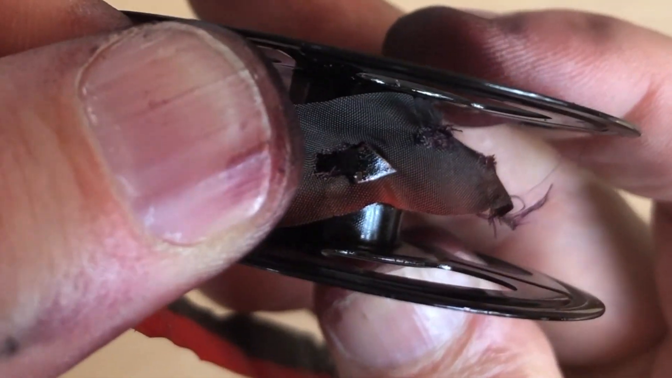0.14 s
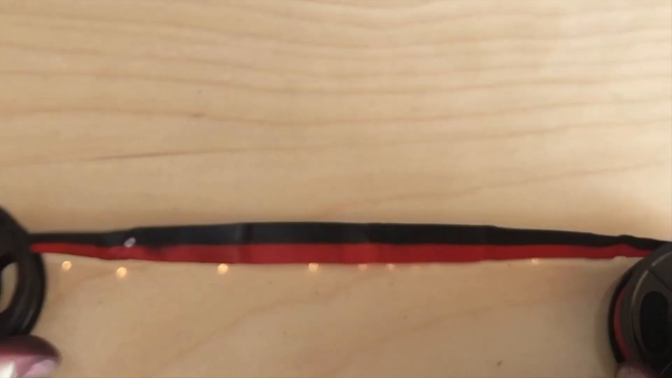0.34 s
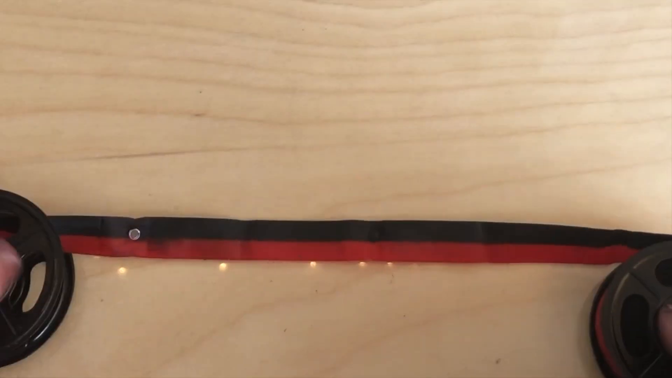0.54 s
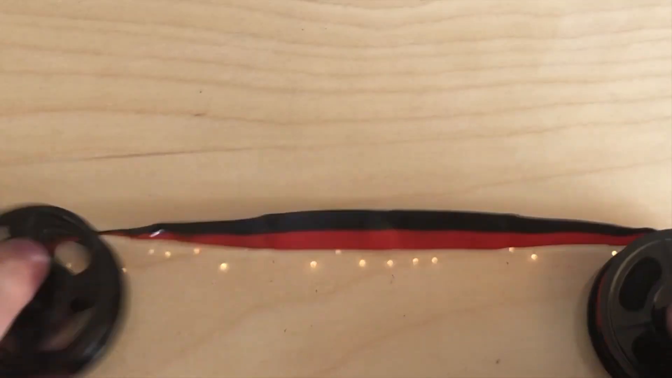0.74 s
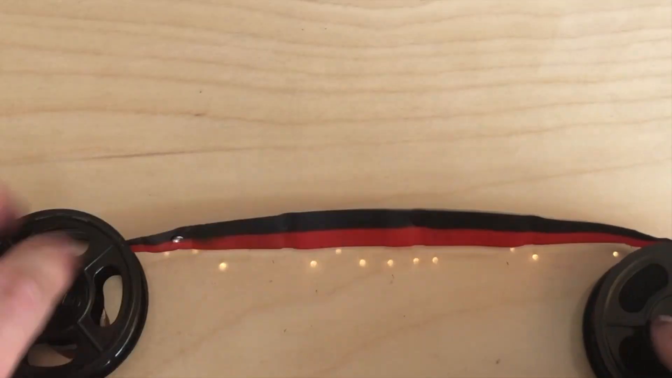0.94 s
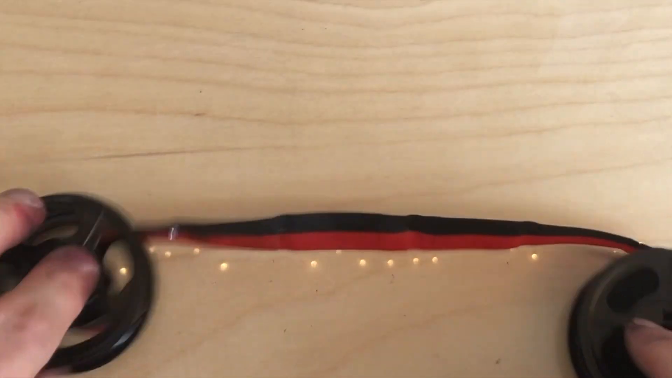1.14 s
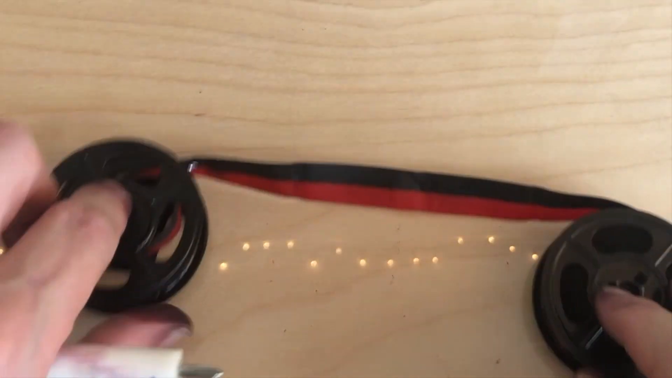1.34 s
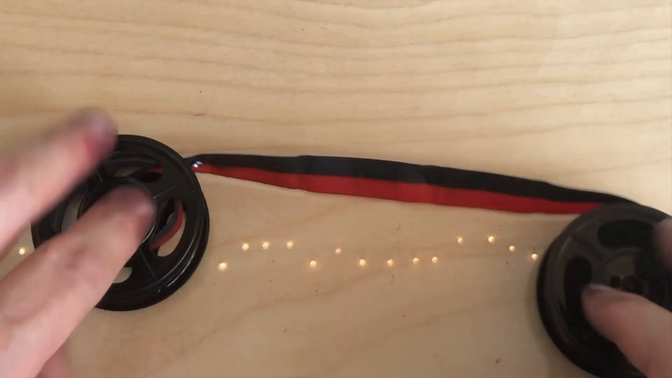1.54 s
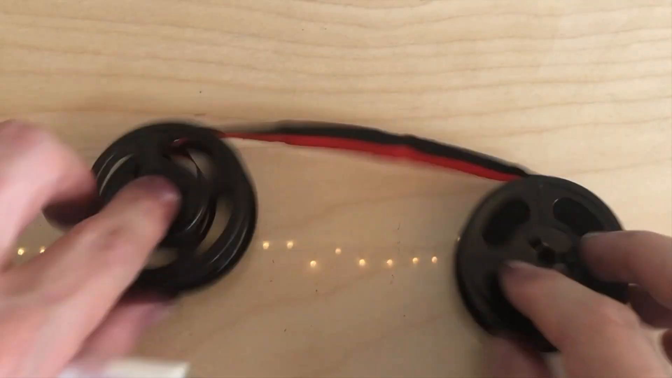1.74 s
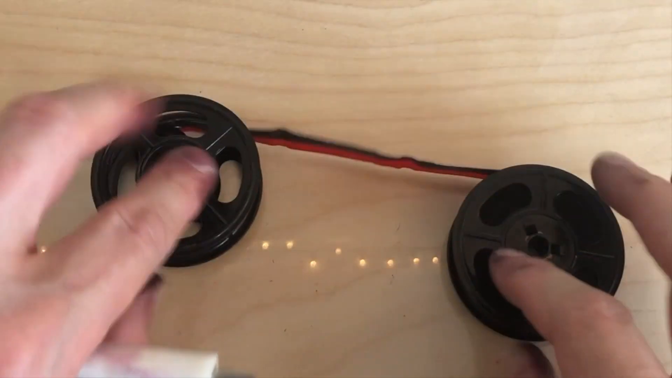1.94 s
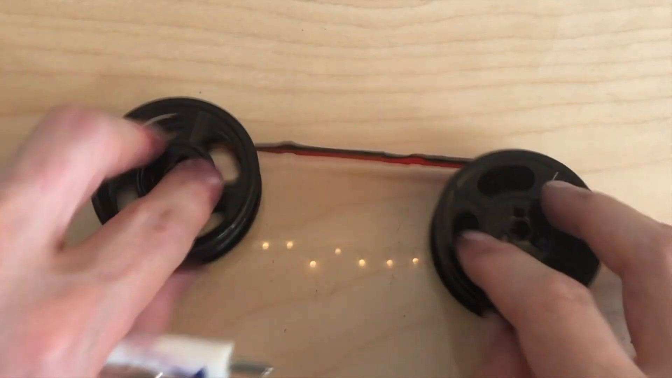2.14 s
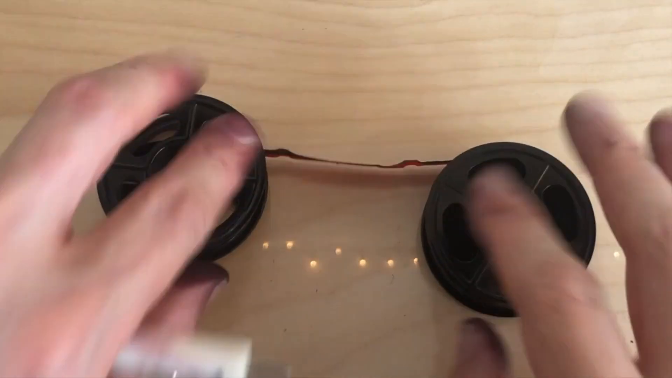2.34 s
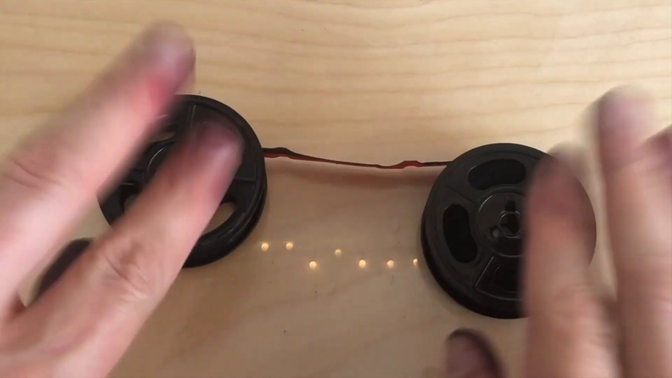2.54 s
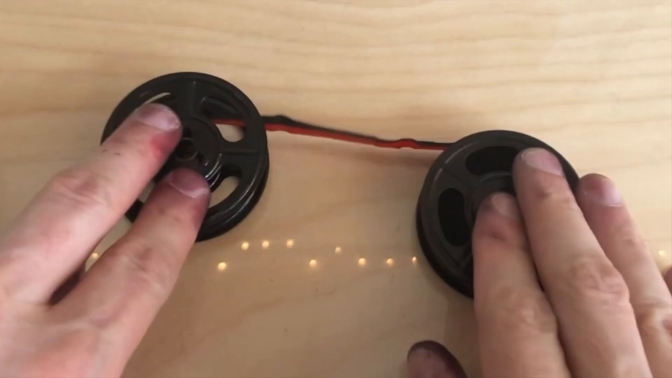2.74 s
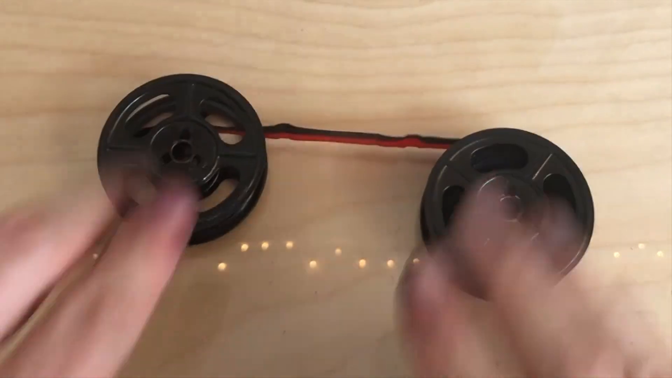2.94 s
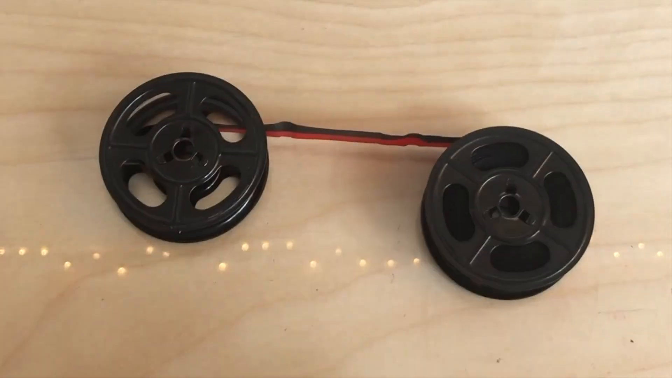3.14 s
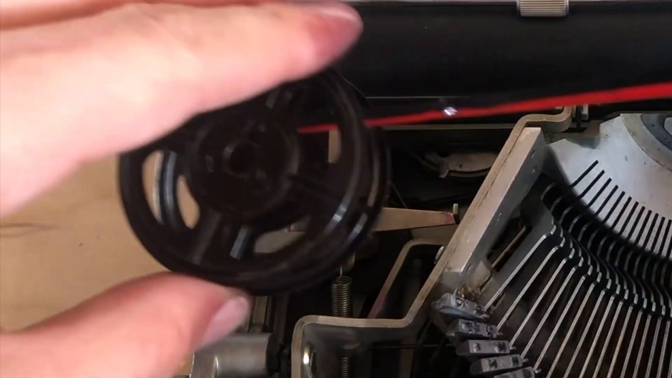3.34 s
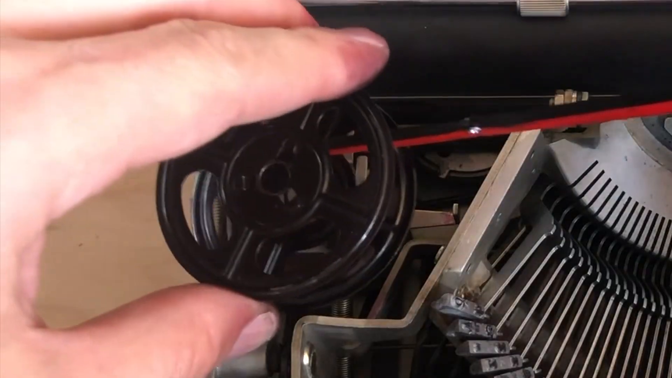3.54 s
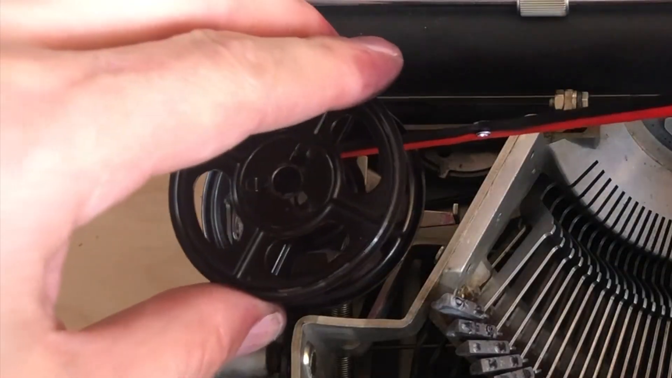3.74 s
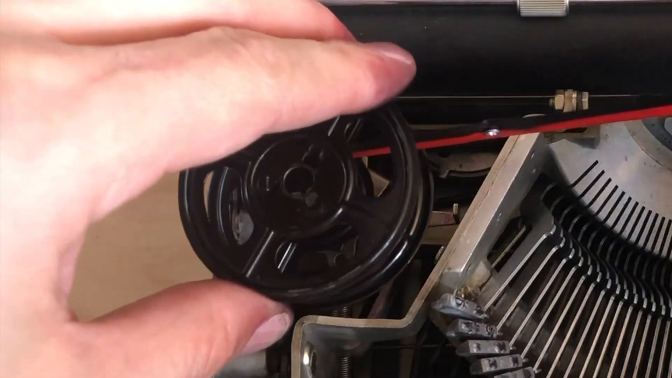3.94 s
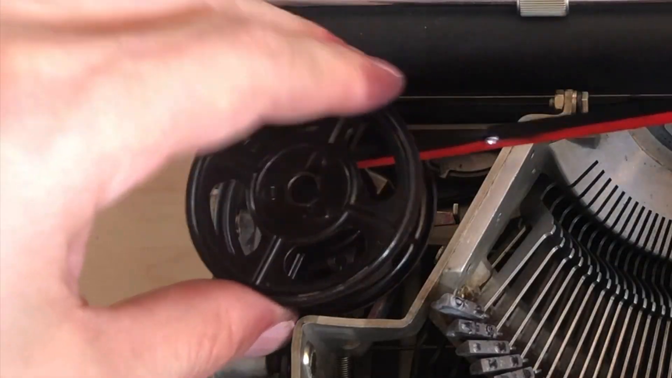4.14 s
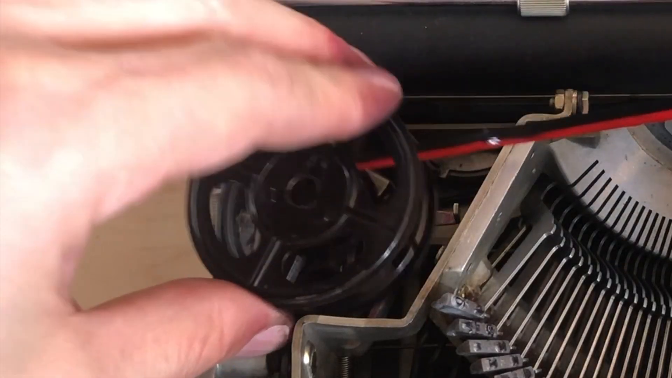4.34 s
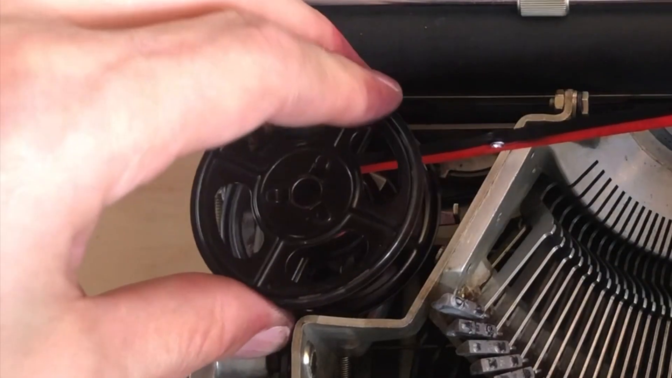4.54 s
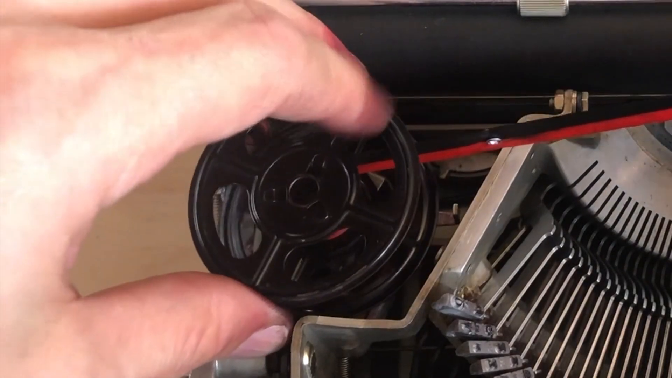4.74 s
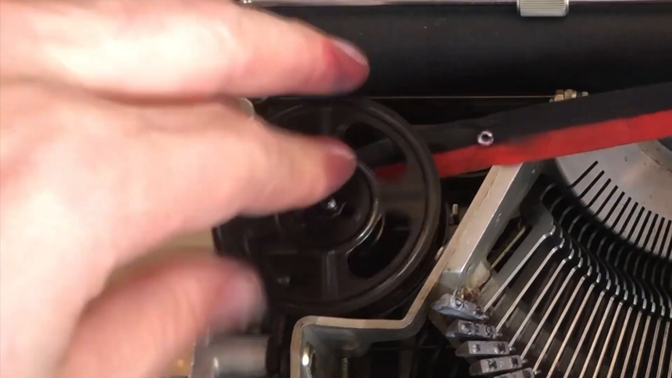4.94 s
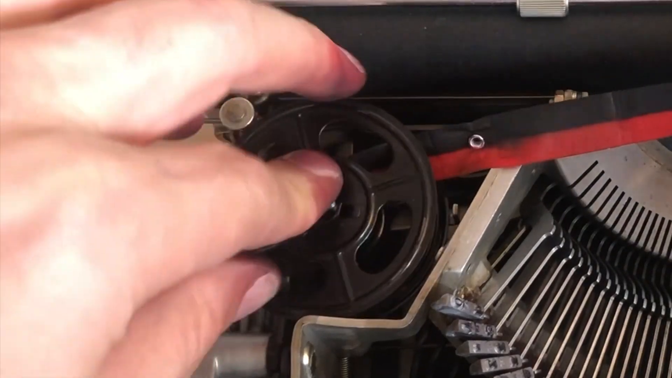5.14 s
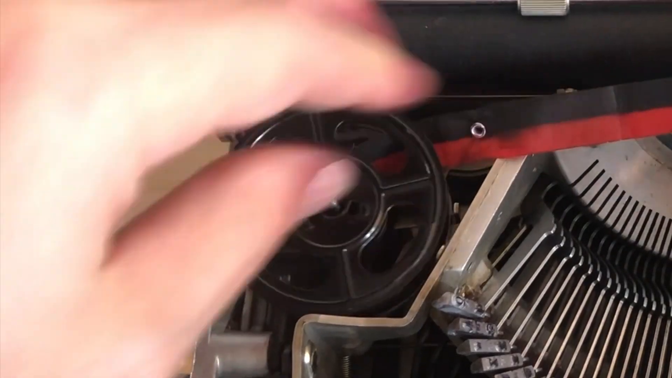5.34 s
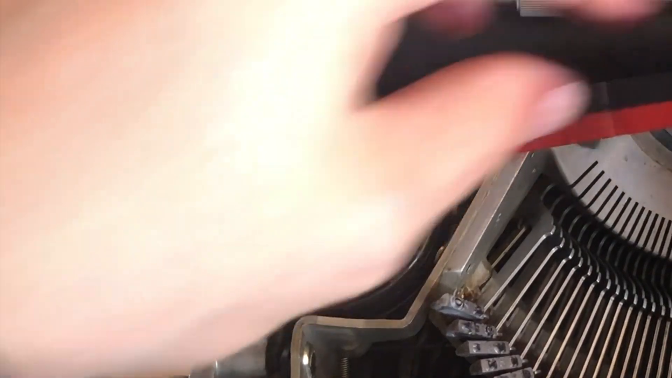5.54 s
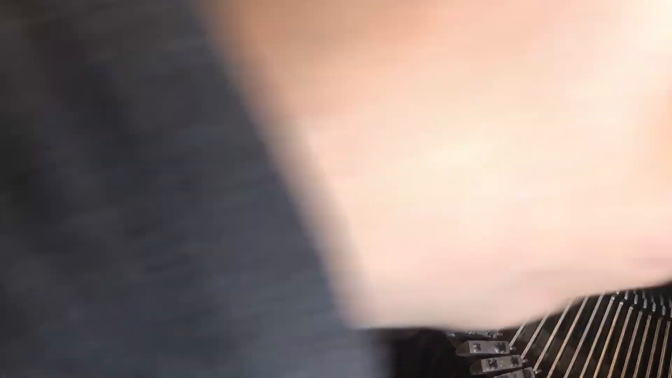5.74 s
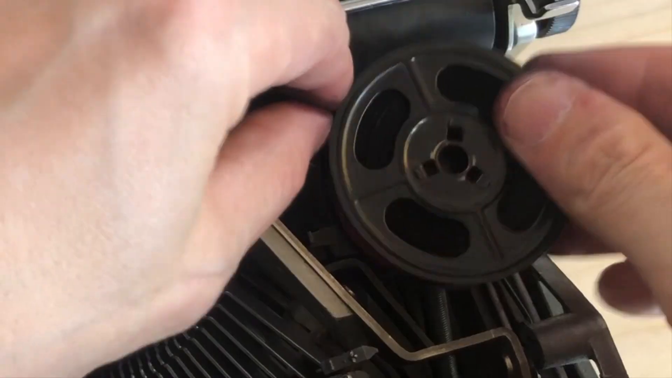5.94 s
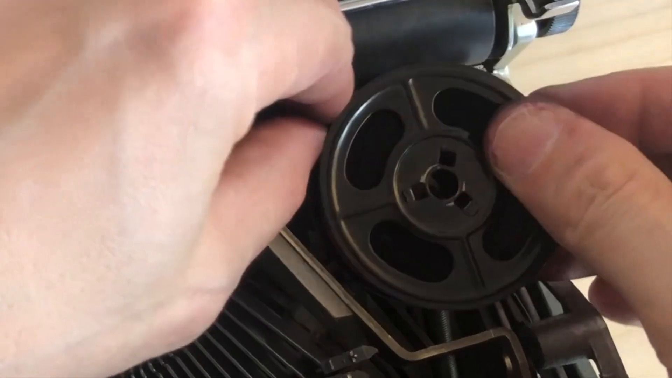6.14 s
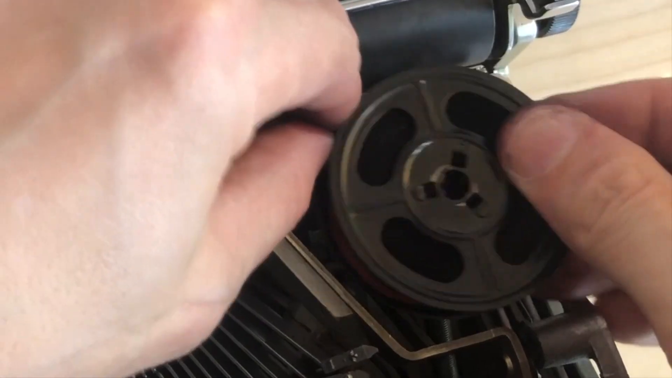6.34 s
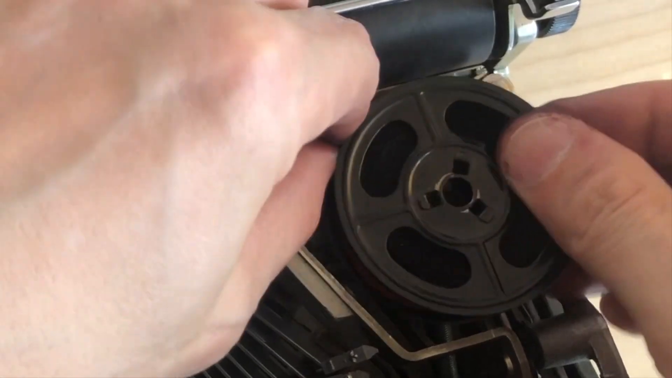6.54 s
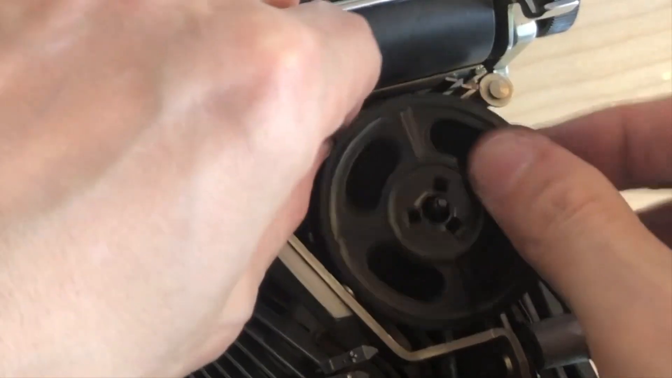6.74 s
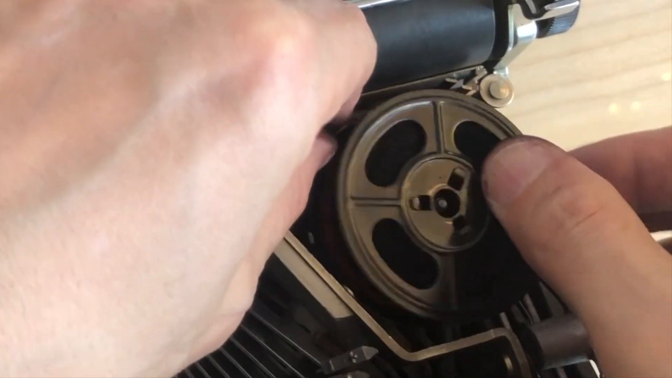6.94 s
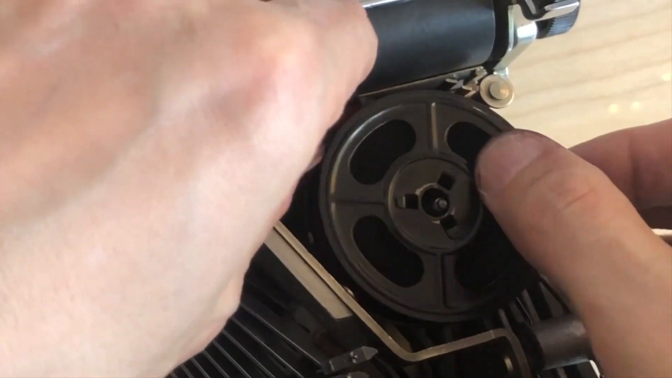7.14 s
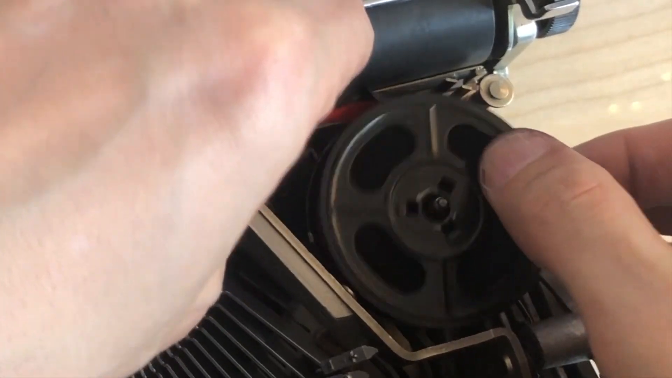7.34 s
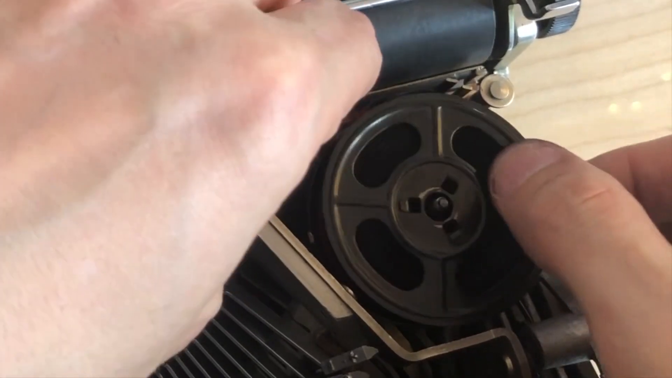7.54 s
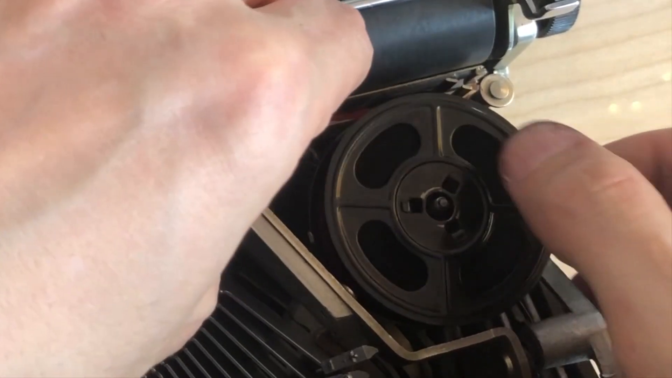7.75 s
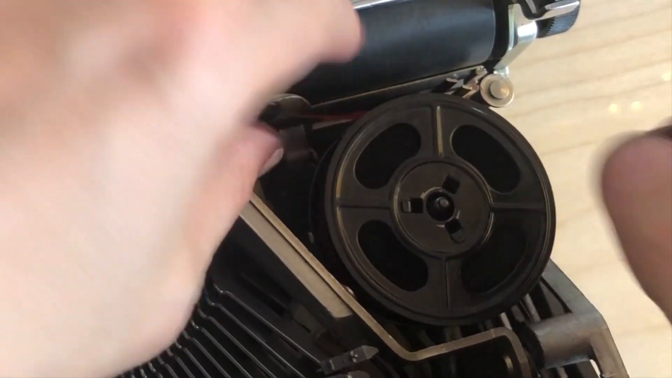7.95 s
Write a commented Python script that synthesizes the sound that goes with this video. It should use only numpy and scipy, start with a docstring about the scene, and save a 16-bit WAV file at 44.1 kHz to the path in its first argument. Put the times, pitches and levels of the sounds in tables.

```python
"""A wooden table in a small room, one microphone close by: two plastic ribbon spools are turned and tapped,
then from about 4 s set on the posts of a typewriter. Each contact is a knock plus a short chatter of noise,
made of decaying sines for the spool and what it rests on; knocks also push the board's low modes.
Pings, rubbing fingers and runs of sliding contacts join in, and a decaying noise tail answers as the room.
Shaped noise makes the room hiss and a slow rumble, both quieter once the scene moves to the typewriter."""
import sys
import numpy as np
from scipy import signal
from scipy.fft import rfft, irfft
from scipy.io import wavfile
from scipy.ndimage import uniform_filter1d

SR = 44100
rng = np.random.default_rng(int(sys.argv[2]) if len(sys.argv) > 2 else 0)


def amplitude_ratio(level_db):
    """Convert a level in decibels to the matching linear amplitude (field) ratio."""
    exponent = np.asarray(level_db, float) / 20
    return 10 ** exponent


def log_audio(samples):
    """Write samples as a 16-bit WAV file to the path given in sys.argv[1]."""
    # one column per channel
    frames = np.atleast_2d(samples).T
    # limit to full scale, then quantise
    limited = np.clip(frames, -1, 1)
    pcm = np.round(limited * 32767).astype(np.int16)
    wavfile.write(sys.argv[1], SR, pcm)


N = 356592  # samples


def rms_one(x):
    """Scale to unit rms."""
    return x / np.sqrt(np.mean(x ** 2) + 1e-20)


def in_time(rows):
    """A (time_s, level_db) curve as a gain for every sample."""
    time_s, level_db = np.transpose(rows)
    return amplitude_ratio(np.interp(np.arange(N) / SR, time_s, level_db))


def ring(force, hz, t60_s):
    """A two-pole resonator: a unit click sets a sine of height 1 ringing."""
    radius = amplitude_ratio(-60 / (t60_s * SR))
    turn = 2 * np.pi * hz / SR
    return signal.lfilter([0, np.sin(turn)], [1, -2 * radius * np.cos(turn), radius ** 2], force + 1e-18)


def coloured(spectrum):
    """White noise shaped to a (pitch_hz, level_db) spectrum; rms 1."""
    hz, level_db = np.transpose(spectrum)
    grid_hz = np.maximum(np.fft.rfftfreq(N, 1 / SR), 1)
    gain = amplitude_ratio(np.interp(np.log(grid_hz), np.log(hz), level_db))
    return rms_one(irfft(rfft(rng.standard_normal(N)) * gain, N))


# room hiss at the table: pitch_hz [Hz], level_db [relative dB per Hz]
TABLE_HISS = [(24, -63), (40, -0.5), (92, -10), (341, -11), (377, -13), (427, -9.5), (550, -12),
              (933, -13.5), (5870, -30), (14500, -35.5), (16500, -36)]
# room hiss at the typewriter: pitch_hz [Hz], level_db [relative dB per Hz]
POST_HISS = [(24, -38), (40, 7), (168, -7), (293, -4.5), (438, -5), (656, -6), (707, -8.5), (1230, -10.5),
             (3290, -20), (14200, -30.5), (16500, -31)]
# level of the rumble, mostly under 20 Hz: time_s [s], level_db [dB rms]
RUMBLE_LEVEL = [(0, -51), (.6, -42.5), (3.33, -43), (3.4, -53), (8.09, -54.5)]


def air():
    """Steady hiss that steps down at the move, over a wandering rumble: both are shaped noise."""
    move_s, table_hiss_db, post_hiss_db = 3.357, -52, -58.5
    at_table = np.arange(N) < move_s * SR
    table_hiss = amplitude_ratio(table_hiss_db) * coloured(TABLE_HISS)
    post_hiss = amplitude_ratio(post_hiss_db) * coloured(POST_HISS)
    hiss = np.where(at_table, table_hiss, post_hiss)
    rumble = coloured([(1, -8), (3.0, 6), (17, 7.5), (34, -15.5), (44, -46), (90, -58), (200, -120)])
    return hiss + in_time(RUMBLE_LEVEL) * rumble


# thin flanges of the spool, rung by every contact: pitch_hz [Hz], level_db [relative dB], t60_s [s, before grip]
FLANGE_MODES = [(3490, -4, 0.019), (4780, -8, 0.05), (6450, -5, .04), (8850, -23, 0.013),
                (12200, -7, 0.029), (13600, -16, 0.022)]
# moments when the fingers let the spool ring freely: start_s [s], end_s [s]
FREE_MOMENTS = [(.8, .9), (1.8, 1.9), (4.0, 4.7), (4.97, 5.5), (6.53, 6.6)]


def struck(events, modes, splits_hz, main, level_db, chatter_ms, swell, body_db, grit_db, crack_db,
           crack_hz, scatter_db):
    """Modes swell while tiny contacts chatter, then ring out; the chatter is noise; rows: rings, noise."""
    firm_db, soft_chatter_db_per_db = -21.5, 0.25   # contacts softer than a firm one chatter longer
    free_share, held_share = 0.76, 0.49             # share of the modes' t60, let go and gripped
    flutter = 3.7                                   # loose contacts roughen each ring
    size = 8192                                     # samples per contact
    t = np.arange(size) / SR
    modes = modes + FLANGE_MODES
    hz, mode_db, t60_s = np.transpose(modes)[:, :, None]
    group = np.searchsorted(splits_hz, hz)
    luck = rng.standard_normal((len(events), 4, len(modes), 1))
    grit = rng.standard_normal((len(events), 3, size))
    clumps = np.minimum(rng.exponential(1, (len(events), 1, size // 32)), 2.5)   # each under 1 ms
    grit = grit * (0.8 + np.repeat(clumps, repeats=32, axis=2))
    body = signal.butter(2, [350, splits_hz[1]], "band", fs=SR, output="sos")
    middle = signal.butter(2, splits_hz[1:], "band", fs=SR, output="sos")
    treble = signal.butter(1, crack_hz, "band", fs=SR, output="sos")
    wobble = uniform_filter1d(rng.standard_normal((len(modes), 4 * size)), size=150, axis=1)
    rough = 1 + flutter * wobble
    out = np.zeros((2, N + size))
    for (start_s, db, second_db, middle_db, treble_db), grains, chance in zip(events, grit, luck):
        at = round(start_s * SR)
        chatter_s = chatter_ms / 1000 * amplitude_ratio(soft_chatter_db_per_db * (firm_db - db))
        group_db = np.insert([second_db, middle_db, treble_db], main, 0)[group]   # main group at 0 dB
        spread_db = scatter_db * chance[0] * (0.5 + 0.5 * (group > 1))   # upper modes vary more
        strength = amplitude_ratio(group_db + mode_db + spread_db)
        # the grip detunes and damps each hit anew
        pitch_hz = hz * (1 + 0.0062 * chance[1])
        free = any(a < start_s < b for a, b in FREE_MOMENTS)
        held_t60_s = t60_s * amplitude_ratio(chance[2]) * (free_share if free else held_share)
        fade = amplitude_ratio(-60 * (t / held_t60_s) ** 1.286)   # the ring holds a moment, then the fingers choke it
        rise = (1 - np.exp(-t / (swell * chatter_s))) ** 2
        roughness = rough[:, at % (3 * size):][:, :size]
        sines = np.sin(2 * np.pi * (pitch_hz * t + chance[3]))
        tones = np.sum(strength * fade * roughness * sines, axis=0) * rise
        grains = grains * np.exp(-t / chatter_s) * (1 - np.exp(-t / 0.0013))
        noise = amplitude_ratio(middle_db + grit_db) * signal.sosfilt(middle, grains[0])
        crack = grains[1] * np.exp(-0.3 * t / chatter_s)   # the treble dies sooner
        noise += amplitude_ratio(treble_db + crack_db) * signal.sosfilt(treble, crack)
        noise += amplitude_ratio(body_db) * signal.sosfilt(body, grains[2])   # many weak modes too close to tell apart
        out[:, at:at + size] += amplitude_ratio(db + level_db) * np.array([tones, noise])
    return out[:, :N]


# spool on table: start_s [s], level_db [dB of hollow tone, before the layer level], then relative to it
# second_db [dB, second tone], middle_db [dB, middle modes], treble_db [dB]
SPOOL_TAPS = [(0.573, -43, -22, -6, -10), (0.607, -20.5, -21, -26, -35), (0.632, -19.5, -35, -15.5, -28),
              (0.853, -13.5, -4.5, -9, -4.5), (0.864, -14.5, -21, -11.5, -15), (1.06, -44.5, -22, -4.5, -8),
              (1.107, -24.5, -24, -19, -28), (1.125, -25, -22, -12.5, -17), (1.612, -22.5, -38, -25, -39),
              (1.826, -29.5, 0.5, -10, -10), (1.833, -20.5, -11, -14, -22), (2.096, -27, -33, -20.5, -31),
              (2.225, -45, -23, -4.5, -24), (2.314, -29.5, -15, -22, -29), (2.631, -15, -23, -50, -45),
              (2.636, -15.5, -6.5, -18.5, -16)]
# modes of spool and table: pitch_hz [Hz], level_db [relative dB], t60_s [s, before grip]
TABLE_MODES = [(268.5, -24.5, 0.13), (429.7, 3, 0.071), (498, -17, 0.093), (574.5, -7.5, 0.019),
               (753, 25.5, 0.0097), (790, -8.5, 0.14), (1312, 6, 0.072), (1490, 18, 0.02), (1827, 8, 0.02),
               (2166, 8.5, 0.043), (2530, -4, 0.057), (2960, 31.5, 0.0068)]


def table_taps():
    """Spool and tabletop modes ring at each tap, the hollow lowest group leading."""
    return struck(SPOOL_TAPS, TABLE_MODES, splits_hz=[600, 1100, 4000], main=0, chatter_ms=5.1, level_db=-2.0,
                  swell=0.87, body_db=-4.5, grit_db=4.0, crack_db=0.0, crack_hz=[9000, 19000], scatter_db=2.5)


# soft pushes of the hands into the table: start_s [s], level_db [dB, before the board's modes]
HAND_PUSHES = [(1.118, -52), (2.636, -25), (6.151, -54.5), (6.82, -49), (6.999, -58)]
# low modes of the board: pitch_hz [Hz], level_db [dB], t60_s [s]
BOARD_MODES = [(33.2, -9.5, 0.34), (75, -41, 0.059), (119.5, 2.5, 0.31), (152.4, 1.5, 0.17),
               (179, -8.5, 0.22)]


def thuds():
    """Hands, taps and clicks push the board for about a millisecond and set its low modes going."""
    contact_ms = 0.58   # time constant of a push
    tap_push_db, click_push_db = -54.5, -52   # push of a contact whose listed level is -19.5 dB
    push_follows = 0.8                        # share of the contact's swing in dB
    pushes = np.zeros(N)
    for start_s, level_db in HAND_PUSHES:
        pushes[round(start_s * SR)] = amplitude_ratio(level_db)
    for rows, push_db in [(SPOOL_TAPS, tap_push_db), (SPOOL_CLICKS, click_push_db)]:
        for start_s, level_db, *_ in rows:
            pushes[round(start_s * SR)] += amplitude_ratio(push_db + push_follows * (level_db + 19.5))
    r = np.exp(-1000 / (contact_ms * SR))
    pushes = signal.lfilter([(1 - r) ** 2], [1, -2 * r, r * r], pushes + 1e-18)
    return sum(amplitude_ratio(mode_db) * ring(pushes, hz, t60_s) for hz, mode_db, t60_s in BOARD_MODES)


def room(x):
    """A dense noise tail of reflections, the treble dying faster."""
    t60_s, level_db, wall_hz, low_cut_hz = 0.26, -7.5, 3760, 295
    t = np.arange(SR // 2) / SR
    slow, fast = rng.standard_normal((2, len(t))) * (t > 0.004)   # nothing returns in the first 4 ms
    slow = signal.lfilter(*signal.butter(1, wall_hz, fs=SR), slow) * amplitude_ratio(-60 * t / t60_s)
    tail = slow + fast * amplitude_ratio(-60 * t / (0.28 * t60_s))
    tail = signal.lfilter(*signal.butter(1, low_cut_hz, "high", fs=SR), tail)   # little bass returns
    tail = tail / np.sqrt(np.sum(tail ** 2))
    return amplitude_ratio(level_db) * signal.fftconvolve(x, tail)[:N]


# single tones that stand out of some contacts: start_s [s], pitch_hz [Hz],
# level_db [dB, before roughening], t60_s [s]
SINGLE_TONES = [(.856, 6300, -39, .08), (1.125, 2870, -38, 0.045), (1.833, 2166, -26, 0.036),
                (2.638, 3350, -21.5, 0.013), (4.311, 520, -39, .022), (4.426, 4360, -61, 0.18),
                (4.909, 6200, -54, 0.11), (5.146, 8850, -43, 0.018), (6.37, 6620, -44.5, 0.081),
                (6.549, 6460, -36.5, 0.049), (6.663, 4780, -34.5, 0.065), (6.679, 5700, -37, 0.043),
                (6.755, 13500, -39, .017)]


def pings():
    """Each ping is one roughened mode, a decaying sine with a quick rise."""
    out = np.zeros(N)
    t = np.arange(N // 40) / SR
    flutter = uniform_filter1d(rng.standard_normal((len(SINGLE_TONES), len(t))), size=60, axis=1)
    for (start_s, pitch_hz, level_db, t60_s), rough in zip(SINGLE_TONES, flutter):
        at = round(start_s * SR)
        tone = np.sin(2 * np.pi * pitch_hz * t) * (1 + 7.7 * rough) * (1 - np.exp(-t / 0.00082))
        out[at:at + len(t)] += amplitude_ratio(level_db - 60 * t / t60_s) * tone
    return out


# fingers rubbing spool and ribbon: time_s [s], level_db [dB rms]
RUBBING_LEVEL = [(0, -90), (3.9, -72.5), (4.25, -67.5), (4.4, -57.5), (4.55, -62), (4.8, -62.5), (5.0, -61),
                 (5.8, -71.5), (6.5, -66.5), (7.2, -71.5), (8.09, -88)]
# modes of spool and post: pitch_hz [Hz], level_db [relative dB], t60_s [s, before grip or rubbing]
POST_MODES = [(236, -7.5, 0.072), (450, -2, 0.067), (785, 7.5, 0.069), (958, -40, 0.013),
              (1030, 13.5, 0.025), (1139, -1, 0.1), (1643, -5.5, 0.091), (1953, -3, 0.043),
              (2180, -3.5, 0.042), (2790, 0, 0.047), (3150, -19, 0.024)]


def rubbing():
    """Fine random grains of friction sound through the modes of spool and post, at half their t60."""
    clumps = np.repeat(rng.exponential(1, N // 900 + 1), repeats=900)[:N]   # stick and slip every 20 ms
    hits = rng.random(N) < 2000 * clumps / SR   # 2000 grains a second on average
    grains = hits * rng.standard_normal(N) * rng.exponential(1, N)
    rub = sum(amplitude_ratio(mode_db) * ring(grains, hz, 0.5 * t60_s) for hz, mode_db, t60_s in POST_MODES)
    return in_time(RUBBING_LEVEL) * rms_one(rub)


# spool on post: start_s [s], level_db [dB of ring, before the layer level], then relative to it
# lower_db [dB, lower tone], middle_db [dB, middle modes], treble_db [dB]
SPOOL_CLICKS = [(4.014, -44, -17, -5, -24), (4.056, -51, 8.5, -25, -6), (4.22, -42.5, -11, -24, -26),
                (4.277, -39, -22, -32, -34), (4.375, -44.5, 6.5, -28, -17), (4.505, -45, 5, -5, -8),
                (4.524, -43, -10, -21, -8), (4.657, -43, -20, -7, -9), (4.892, -27.5, -10, -31, -17),
                (4.907, -23, -12, -7.5, -8.5), (4.977, -15.5, -12, -5, -3), (4.99, -22, -30, -12, -2.5),
                (5.147, -37.5, -16, -4, -13), (5.29, -55, 10, -17, -1), (5.92, -37.5, -5, -15, -20.5),
                (6.024, -34, -3, -18, -13.5), (6.149, -28.5, -5.5, -3.5, -7), (6.306, -37, -19, -27, -28.5),
                (6.368, -29, -22, -33, -5.5), (6.372, -21, -16, -21.5, -24), (6.518, -39, -9, -7, -21),
                (6.542, -32, -10, -26, -21), (6.548, -26.5, -29, -36, -2), (6.555, -22, -19, -39, -20.5),
                (6.654, -21.5, -16, -11, -7), (6.753, -22.5, -4.5, -13, -18), (6.817, -23.5, -7, -7, -6.5),
                (6.825, -24, -11, -11, -17), (7.412, -39, 4, -2, -15), (7.418, -25.5, -6, -8.5, -9)]


def post_clicks():
    """Spool and post modes ring at each click and sliding contact, the second group leading."""
    return struck(SPOOL_CLICKS + slides(), POST_MODES, splits_hz=[900, 1400, 4000], main=1, chatter_ms=4.42,
                  level_db=-6.0, swell=0.86, body_db=0.5, grit_db=3.5, crack_db=1.0, crack_hz=[4500, 17000],
                  scatter_db=4.5)


# spool sliding down the post: start_s [s], length_s [s], level_db [dB of ring, before spread and layer level],
# then relative to the ring middle_db [dB, middle modes], treble_db [dB]
POST_SLIDES = [(4.403, 0.026, -48, -2.5, -9.5), (4.952, 0.023, -27.5, -9, -8), (5.305, .018, -44, -7, -9),
               (5.342, .024, -43, -12, -11.5), (6.034, 0.021, -45, -9, -13), (6.636, 0.015, -35, -8, -18),
               (6.656, .03, -33, -2.5, -5.5)]


def slides():
    """Each slide is five uneven contacts spread over its length; gives rows for the clicks."""
    lower_db, uneven_db = -2, 7.5   # lower tone re the ring; largest spread either way
    luck = rng.random((len(POST_SLIDES), 5, 2))
    contacts = []
    for (start_s, length_s, level_db, middle_db, treble_db), row in zip(POST_SLIDES, luck):
        for k, (late, size) in enumerate(row):
            contact_s = start_s + length_s * (k + 0.6 * late) / 5
            contact_db = level_db + uneven_db * (2 * size - 1)
            contacts.append((contact_s, contact_db, lower_db, middle_db, treble_db))
    return contacts


def scene():
    """Contacts, their room, and the air, summed at one microphone."""
    rings, noise = table_taps() + post_clicks()
    rings = rings + pings() + thuds() + rubbing()
    room_feed = noise + amplitude_ratio(-6) * rings   # less of the rings than of the noise goes into the room tail
    return (rings + noise + room(room_feed) + air())[None]


def band_limit(x):
    """A steep low-pass at the top of the band."""
    return signal.sosfilt(signal.butter(12, 16810, fs=SR, output="sos"), x)


def record(dry):
    """A steep low-pass takes off the top, 60 dB down from 16950 Hz."""
    top_cut = signal.cheby2(12, 60, 16950, fs=SR, output="sos")
    mix = signal.sosfilt(top_cut, dry)
    return band_limit(mix)


dry = scene()
out = record(dry)
log_audio(out)
```